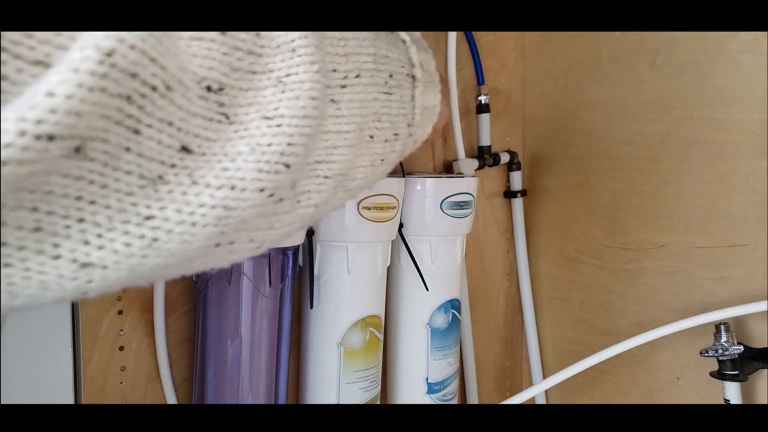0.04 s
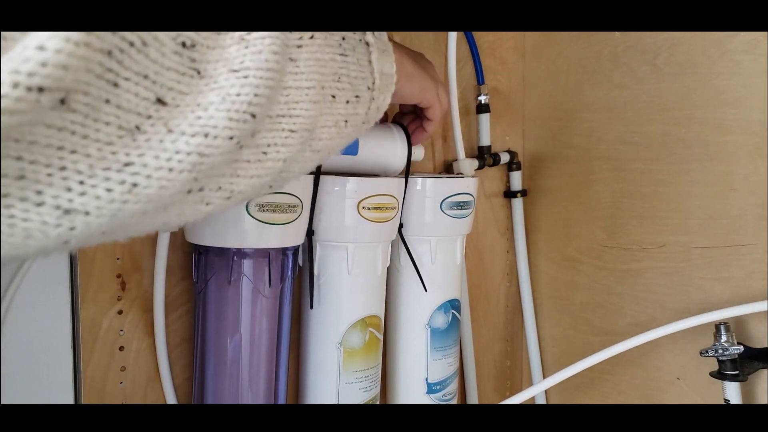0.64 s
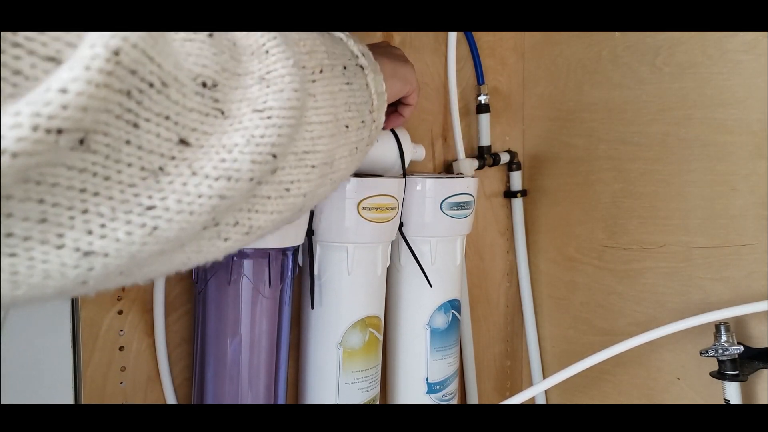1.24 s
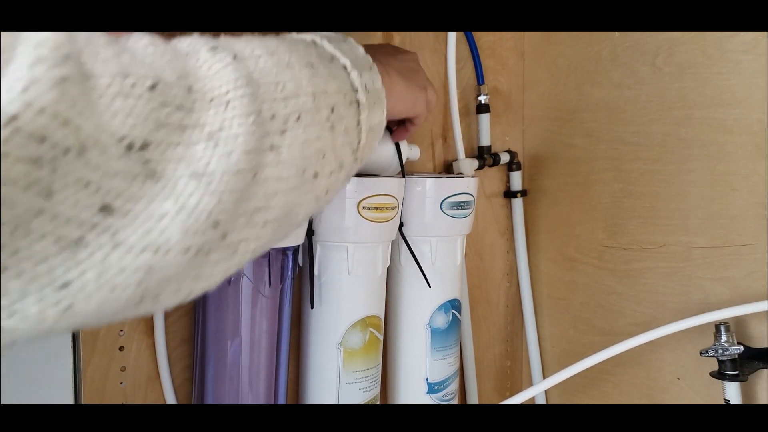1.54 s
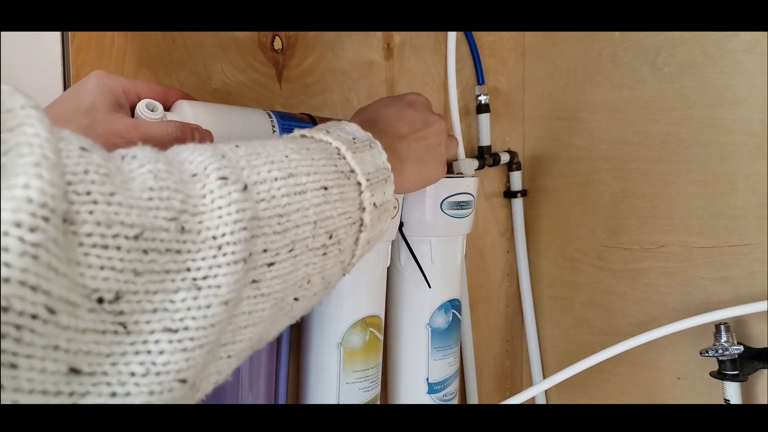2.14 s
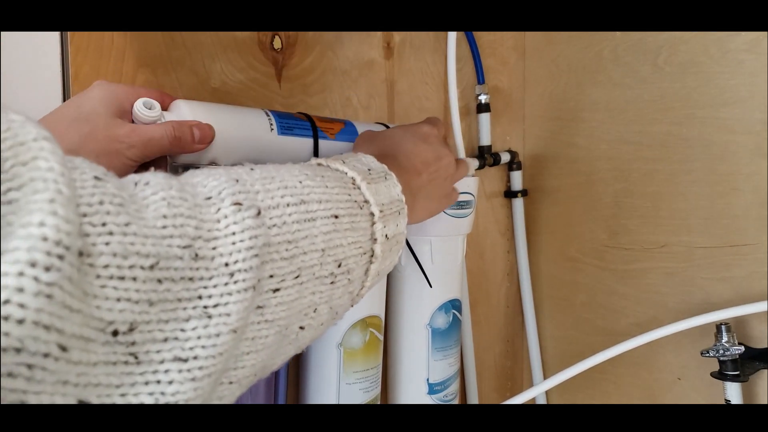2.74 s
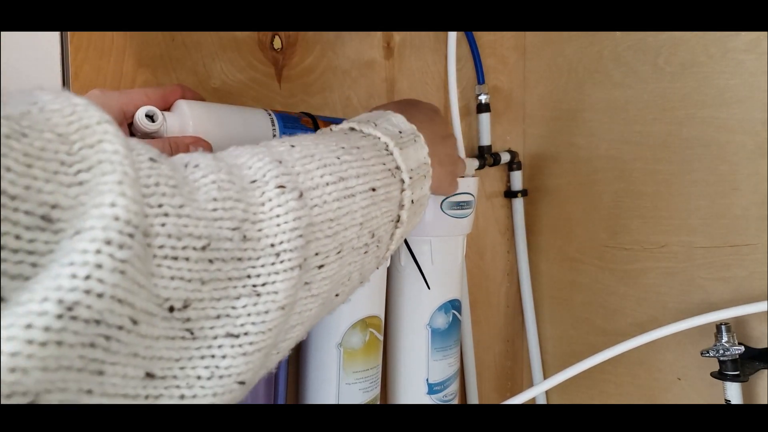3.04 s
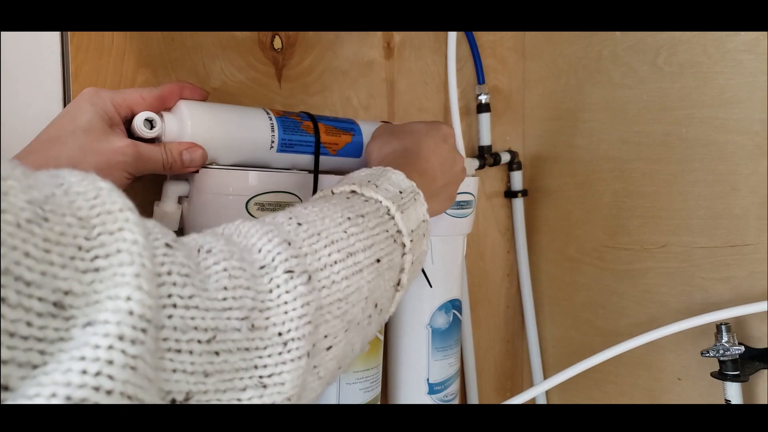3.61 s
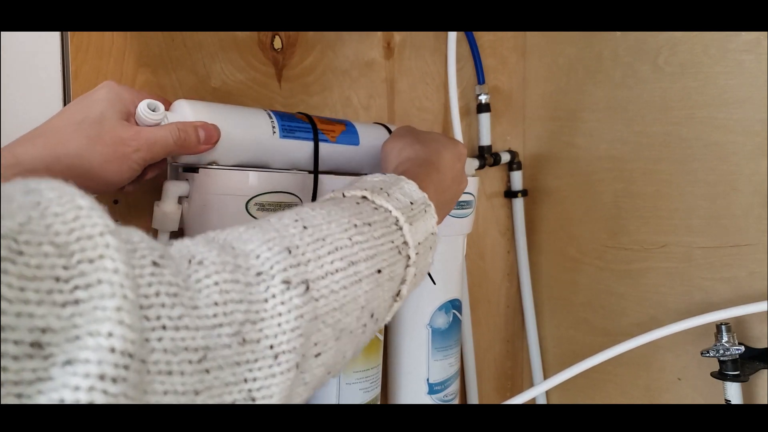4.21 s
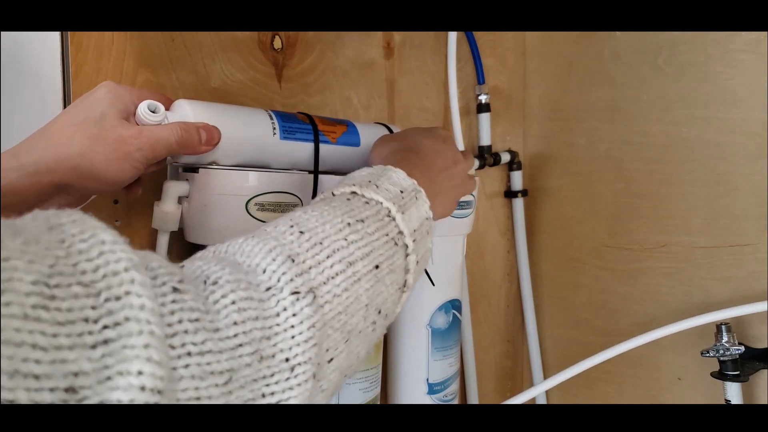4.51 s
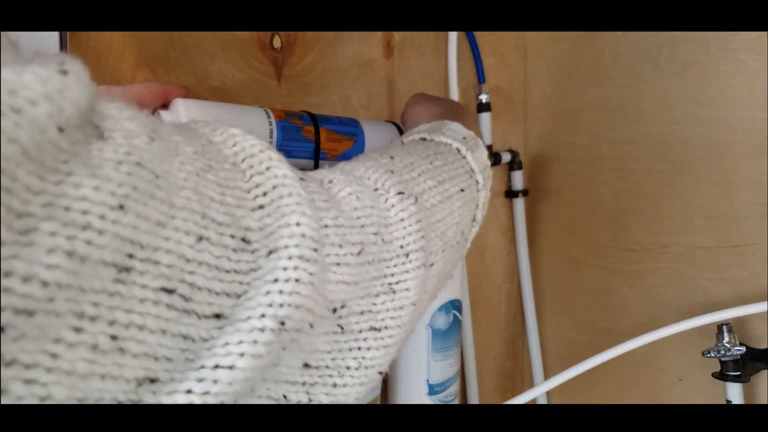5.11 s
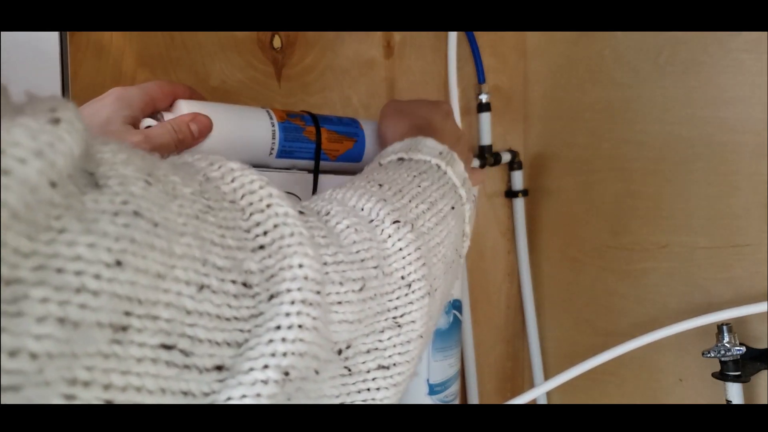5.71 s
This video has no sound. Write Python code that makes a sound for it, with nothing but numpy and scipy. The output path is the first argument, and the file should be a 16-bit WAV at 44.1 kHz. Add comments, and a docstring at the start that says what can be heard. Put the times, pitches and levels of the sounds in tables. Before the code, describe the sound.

A plastic filter cartridge is worked onto plastic housings, with irregular knocks, deep wooden thumps, clicks, scrapes and rubbing over a low indoor rumble.

```python
"""A plastic filter cartridge is worked through a cable tie on a row of housings in a wooden cabinet.
A faint indoor rumble and the rub of hands and a knitted sleeve are there from the start. At once the
first shove bumps the housings and sets the panel behind them booming; the plastic taps, scrapes, clicks
and hoots as it slips. Just after one second the cartridge drops onto a lid with a hollow knock. More
shoves follow, and between about four and five seconds the plastic squeaks under a tight grip."""
import sys
import numpy as np
from scipy import signal
from scipy.fft import rfft, irfft
from scipy.io import wavfile
from scipy.ndimage import map_coordinates

SR = 44100
rng = np.random.default_rng(int(sys.argv[2]) if len(sys.argv) > 2 else 0)


def dump(signal):
    """Clip the signal to [-1, 1] and save it as 16-bit WAV at the path in sys.argv[1]."""
    limited = np.clip(np.atleast_2d(signal).T, -1, 1)
    pcm = np.round(limited * 32767).astype(np.int16)
    wavfile.write(sys.argv[1], SR, pcm)


N = 254016
TIME = np.arange(N) / SR
BLOW = TIME[:SR // 2]   # the time that one blow lasts

# Levels in all tables are relative. A ring_s is the time a tone takes to fade by 60 dB.
# Shoves on the housings: start_s, knock_db, panel_low_tone_db, panel_high_tone_db
SHOVES = [(0.08, -38, -30, -27.5), (0.101, -13, -28, -17.5), (0.127, -14, -16, -26),
          (0.269, -18.5, -19.5, -16.5), (0.573, -13.5, -21.5, -14), (0.67, -46, -38, -28),
          (1.143, -25.5, -24, -15), (1.168, -15.5, -24, -22.5), (1.267, -31, -35, -37),
          (1.403, -35, -32, -46), (1.468, -36, -49, -41), (1.535, -32, -60, -28.5),
          (1.991, -16.5, -19.5, -29), (2.016, -17, -17.5, -17), (2.237, -19.5, -21.5, -27),
          (2.259, -17.5, -20.5, -11.5), (2.578, -18, -28, -9), (2.646, -22, -52, -20),
          (2.723, -29.5, -34.5, -25), (2.976, -15, -20.5, -19.5), (3.007, -25, -27, -18.5),
          (3.064, -18.5, -19.5, -21), (3.155, -13.5, -17, -12), (3.444, -17, -15.5, -31),
          (3.602, -18, -38, -16), (3.667, -22, -44, -19), (3.731, -12, -16, -20.5),
          (3.913, -17, -17, -14.5), (4.022, -10, -14.5, -12.5), (4.093, -33, -18.5, -12),
          (4.275, -38, -26.5, -16), (4.479, -35.5, -30.5, -49), (4.656, -26, -23.5, -24),
          (4.781, -23.5, -27, -10.5), (5.01, -30, -27, -40), (5.063, -10.5, -31, -11.5),
          (5.281, -17, -23, -21.5), (5.426, -26, -19.5, -23), (5.471, -23, -41, -27),
          (5.746, -25, -34, -16.5)]
# Tone colour of the cartridge wall: frequency_hz, level_db
WALL_COLOUR = [(250, 11), (500, 0), (850, 2.5), (1060, 0.5), (1170, 6.5), (1290, 2.5), (1700, 2.5),
               (2250, -4), (2900, -15.5), (6000, -29), (16000, -35.5)]


def from_db(db):
    """Turn decibels into a gain to multiply by."""
    return 10 ** (np.asarray(db) / 20)


def rms_one(x):
    """Scale a signal to an average strength (rms) of 1."""
    return x / np.sqrt(np.mean(x ** 2) + 1e-20)


def unit_energy(x):
    """Scale a response so that noise keeps its level when passed through it."""
    return x / np.sqrt(np.sum(x ** 2) + 1e-20)


def at_hz(points, hz):
    """Read between a table's rows, giving each octave equal room."""
    row_hz, value = np.transpose(points)
    return np.interp(np.log(np.maximum(hz, 1)), np.log(row_hz), value)


def add(out, start_s, sound):
    """Mix a sound in at the given time."""
    start = int(np.clip(round(start_s * SR), 0, N - 1))
    out[start:start + len(sound)] += sound[:N - start]


def through(x, response):
    """Pass a sound through a response: the way a thing answers one tiny tap."""
    return signal.fftconvolve(x, response)[:len(x)]


def colour(spectrum, size=8192):
    """Build a response with the given tone colour."""
    log_gain = np.log(from_db(at_hz(spectrum, np.fft.rfftfreq(size, 1 / SR))))
    cepstrum = irfft(log_gain)
    cepstrum[1:size // 2] *= 2   # folded forward, so nothing sounds before the tap
    cepstrum[size // 2 + 1:] = 0
    return unit_energy(irfft(np.exp(rfft(cepstrum))))


def ring(hz, ring_s):
    """One fading tone of a struck object."""
    return np.sin(2 * np.pi * hz * BLOW) * from_db(-60 * BLOW / ring_s)


def contact(decay_s):
    """A touch chatters for a moment as it settles."""
    return rng.standard_normal(len(BLOW)) * np.exp(-BLOW / decay_s)


def drift(per_s):
    """A random wander, about 1 in size, that turns per_s times a second."""
    points = rng.standard_normal(4096)
    return rms_one(np.interp(TIME * per_s, np.arange(len(points)), points))


def shifting(x, depth_db, width_hz, per_s):
    """As the touching point travels, narrow bands of the sound swell and sink."""
    hz, times, frames = signal.stft(x, SR, nperseg=512)
    points = rng.standard_normal((256, 512))
    grid = np.meshgrid(hz / width_hz, times * per_s, indexing="ij")
    patches = map_coordinates(points, grid, order=1, mode="mirror")
    gain = from_db(depth_db * np.tanh(rms_one(patches)))
    return signal.istft(frames * gain, SR, nperseg=512)[1][:N]


def friction(per_s, spread_db, hiss):
    """Rubbing is many tiny slips on a smooth hiss, always changing colour."""
    sizes = from_db(spread_db * np.minimum(rng.exponential(1, N), 3)) * rng.choice([-1, 1], N)
    slips = rms_one(sizes * (rng.random(N) < per_s / SR))
    noise = slips + hiss * rng.standard_normal(N)
    return rms_one(shifting(noise, depth_db=5.5, width_hz=330, per_s=32))


def room_rumble(level_db):
    """The room hums along as a steady low rumble with a thin hiss on top."""
    # Tone colour of the room's noise: frequency_hz, level_db
    room_colour = [(20, -31), (65, 30), (130, -27), (300, -33), (700, -54), (2000, -13), (7000, -59),
                   (9000, 0.5), (16000, 4.5)]
    return from_db(level_db) * through(rng.standard_normal(N), colour(room_colour))


def fidget(level_db):
    """A gain that follows the small movements of the resting grip."""
    # How restless the hands are: time_s, level_db
    restlessness = [(0, -1), (0.07, -8), (0.2, -6), (0.9, 1), (1.55, -3.5), (1.93, -8.5), (2.1, 9),
                    (2.45, -3.5), (3.1, 7), (3.75, -2), (4.4, -3), (4.7, 1.5), (5.3, 5), (5.76, -1.5)]
    return from_db(level_db + np.interp(TIME, *np.transpose(restlessness)))


def shudder(grip_db, shove_db, decay_s):
    """The mounting trembles under the hands, and harder for a moment after each shove."""
    # Tone colour of the trembling: frequency_hz, level_db
    shudder_colour = [(20, -36), (40, -12), (62, 4), (90, 6.5), (125, -14.5), (175, -5.5), (220, -24.5),
                      (260, -19), (420, -36.5), (800, -55.5), (3000, -88)]
    shaken = np.zeros(N)
    for start_s, _, low_db, high_db in SHOVES:
        panel_swing = np.hypot(from_db(low_db), from_db(high_db))
        add(shaken, start_s, from_db(shove_db) * panel_swing * np.exp(-BLOW / decay_s))
    strength = np.hypot(shaken, fidget(grip_db))
    return through(strength * rng.standard_normal(N), colour(shudder_colour))


def rubbing(wool_db, finger_db, uneven_db, rise_s, fall_s):
    """With each stroke wool swishes and fingers drag on the wall with an uneven grip."""
    # Strokes of sleeve and hand along the cartridge: start_s, length_s, swish_db, drag_db
    strokes = [(0.088, 0.22, -40.5, -38), (0.689, 0.13, -51.5, -42), (0.914, 0.34, -47, -43),
               (1.412, 0.17, -50, -50.5), (1.639, .14, -51, -56), (2, 0.086, -44, -57),
               (2.234, 0.087, -44.5, -43.5), (2.527, 0.15, -42.5, -42), (2.895, 0.15, -42.5, -32.5),
               (3.206, 0.083, -49, -35), (3.279, 0.12, -57, -44), (3.428, 0.036, -44, -43),
               (3.594, .1, -48, -37.5), (3.883, 0.23, -49.5, -40), (4.259, 0.037, -47, -34.5),
               (4.481, .055, -40.5, -41.5), (4.69, 0.17, -40, -40.5), (4.948, 0.06, -34, -37.5),
               (5.188, 0.12, -43.5, -38), (5.426, 0.063, -42.5, -37), (5.57, 0.22, -52, -48.5)]
    # Tone colour of the knitted sleeve: frequency_hz, level_db
    wool_colour = [(500, -20.5), (2000, -2), (3500, -4.5), (5500, -4.5), (7300, -1), (8400, -11),
                   (11000, -6.5), (15500, -6.5)]
    swish, drag = fidget(-56), fidget(-57.5)
    for start_s, length_s, swish_db, drag_db in strokes:
        t = TIME - start_s
        speed = np.clip(t / rise_s, 0, 1) * np.exp(-np.maximum(t - length_s, 0) / fall_s)
        swish = np.maximum(swish, from_db(swish_db) * speed)
        drag = np.maximum(drag, from_db(drag_db) * speed)
    grip_db = uneven_db * drift(per_s=90)
    wool = through(friction(per_s=5600, spread_db=3.5, hiss=1), colour(wool_colour))
    fingers = through(friction(per_s=2400, spread_db=8, hiss=1), colour(WALL_COLOUR))
    return from_db(wool_db + grip_db / 2) * swish * wool + from_db(finger_db + grip_db) * drag * fingers


def panel_booms(low_db, high_db, swell_s):
    """The wooden panel takes a moment to swing up; its two tones throb together as they fade."""
    # The panel's two deep tones: pitch_hz, ring_s
    panel_tones = [(63, 0.39), (91, 0.24)]
    out = np.zeros(N)
    swell = 1 - np.exp(-(BLOW / swell_s) ** 2)
    for start_s, _, shove_low_db, shove_high_db in SHOVES:
        low = from_db(shove_low_db + low_db) * ring(*panel_tones[0])
        high = from_db(shove_high_db + high_db) * ring(*panel_tones[1])
        add(out, start_s, swell * (low - high))
    return out


def housing_knocks(knock_db, clack_db, vary_db, swell_s, clack_s):
    """Each shove rings the housings with a new mix of their tones, and their joints clack."""
    # Tones of the housings on their bracket: pitch_hz, level_db, ring_s
    tones = [(122.3, 1.5, 0.13), (150, 7.5, 0.084), (157, 0.5, 0.14), (183.7, -0.5, 0.16),
             (210, -10.5, 0.33), (259.5, -4.5, 0.24), (289.2, -2.5, 0.09), (308.5, -13.5, 0.26),
             (359.5, -46.5, 0.05)]
    # Tone colour of the joints: frequency_hz, level_db
    clack_colour = [(100, -11), (280, 14.5), (450, -0.5), (650, 6.5), (900, 17.5), (1400, 7.5),
                    (2500, -3.5), (6000, -13.5), (16000, -25.5)]
    knocks, clacks = np.zeros(N), np.zeros(N)
    swell = 1 - np.exp(-BLOW / swell_s)
    for start_s, shove_db, _, _ in SHOVES:
        gains = from_db(vary_db * rng.standard_normal(len(tones))) * rng.choice([-1, 1], len(tones))
        rings = sum(gain * from_db(db) * ring(hz, ring_s) for gain, (hz, db, ring_s) in zip(gains, tones))
        add(knocks, start_s, from_db(shove_db + knock_db) * swell * rings)
        add(clacks, start_s, from_db(shove_db + clack_db) * swell * contact(clack_s))
    return knocks + through(clacks, colour(clack_colour))


def taps(level_db, decay_s):
    """Soft touches on the cartridge wall stir little treble, so they sound dull."""
    # Touches on the wall: start_s, level_db
    touches = [(0.08, -37), (0.105, -22.5), (0.705, -33.5), (0.848, -35), (1.325, -38), (1.466, -30.5),
               (1.487, -32), (1.98, -38.5), (2.585, -25), (2.941, -24.5), (3.159, -31.5), (4.017, -29),
               (4.319, -33.5), (5.065, -29.5), (5.117, -28.5), (5.203, -36.5), (5.411, -30.5)]
    out = np.zeros(N)
    for start_s, db in touches:
        add(out, start_s, from_db(db + level_db) * contact(decay_s))
    return through(out, colour(WALL_COLOUR))


def brighten(x, db, split_hz=6000):
    """A harder contact carries more high treble."""
    top = signal.sosfilt(signal.butter(2, split_hz, "high", fs=SR, output="sos"), x)
    rest = signal.sosfilt(signal.butter(2, split_hz, fs=SR, output="sos"), x)
    return rest - from_db(db) * top


def scrapes(level_db, rise_share, rise_curve):
    """Friction sets in quickly and dies more slowly with each short slide."""
    # Slides of plastic on plastic: peak_s, level_db, length_s, brightness_db
    slides = [(0.093, -34, .026, -2), (0.185, -33, 0.032, -3.5), (0.376, -38.5, 0.032, 1),
              (0.47, -38.5, 0.023, -40), (0.557, -30.5, 0.029, 5.5), (0.634, -38, 0.029, -13),
              (0.767, -40, 0.03, 16.5), (1.006, -21, 0.023, -10.5), (1.078, -39, 0.021, 0),
              (1.166, -24, 0.035, -5.5), (1.992, -37.5, 0.013, -8), (2.097, -38, 0.011, -6),
              (2.211, -30.5, 0.018, -14), (2.579, -19.5, 0.023, -3), (2.67, -43.5, 0.034, 4),
              (2.742, -50, 0.038, 18.5), (2.768, -42, 0.023, 8.5), (2.898, -29.5, 0.026, -15),
              (3.05, -33.5, 0.069, -22), (3.165, -32, 0.032, -43), (3.614, -31, 0.035, -32),
              (3.678, -33.5, .022, 2), (3.741, -34.5, 0.039, -8), (3.94, -37.5, 0.18, 2.5),
              (4.027, -31, 0.013, -1.5), (4.255, -47, .02, 9.5), (4.476, -35.5, 0.031, 4),
              (4.598, -39.5, 0.043, 2.5), (4.664, -31.5, 0.048, -2), (4.742, -24, 0.024, 9),
              (4.789, -25.5, 0.033, -5), (4.932, -39, 0.064, 3.5), (5.065, -36.5, 0.021, 5),
              (5.276, -26.5, 0.032, -24), (5.346, -28.5, .025, 1), (5.417, -32, 0.035, -36)]
    # Tone colour of sliding plastic: frequency_hz, level_db
    slide_colour = [(200, -1), (600, -2), (1500, 1.5), (2600, 4), (3700, 0.5), (5000, -1), (7200, -1.5),
                    (8300, -5), (11000, -3.5), (16000, 1.5)]
    out = np.zeros(N)
    slips = friction(per_s=2500, spread_db=0, hiss=0.93)
    for peak_s, db, length_s, brightness_db in slides:
        near = np.abs(TIME - peak_s) < .2
        progress = (TIME[near] - peak_s) / length_s
        rising = np.abs(progress / rise_share) ** rise_curve
        falling = progress / (1 - rise_share)
        swell = np.exp(-np.where(progress < 0, rising, falling))
        out[near] += from_db(db + level_db) * brighten(slips[near] * swell, brightness_db)
    return through(out, colour(slide_colour))


def shell_ring():
    """The shell rings after one tap, roughened by the hand that grips it."""
    # Tones of the thin plastic shell: pitch_hz, level_db, ring_s
    tones = [(1620, -6, .2), (1666, 0, .25), (1736, -4, .2), (1844, -2, .24), (2407, -2, .18),
             (2587, 2, .2), (2715, -4, .17), (3056, -4, .18), (4275, -1, .19), (4945, 1, .2),
             (5004, -1, .2), (5225, -4, .2), (5784, -4, .18), (6014, -3, .18)]
    out = np.zeros(len(BLOW))
    for k, (hz, db, ring_s) in enumerate(tones):
        grip = 1 + .7 * drift(per_s=150)[:len(BLOW)]
        out += (-1) ** k * from_db(db) * ring(hz, ring_s) * grip
    return unit_energy(out)


def clicks(level_db, rise_s, decay_s, ring_db, echo_db, echo_s):
    """Tie and cartridge edges snap past each other: a crack, near echoes, and the shell ringing on."""
    # Snaps of the tie: start_s, level_db, brightness_db, shell_db
    snaps = [(0.105, -26.5, -17, 2.5), (0.911, -51.5, -3, -35), (0.997, -31, -35, -17),
             (1.167, -26, -8, -23), (1.264, -49.5, 29.5, -13), (2.551, -36.5, 5, -13),
             (2.952, -11, -27.5, -0.5), (3.673, -29, -36, -33), (3.805, -46.5, -20, 13),
             (3.957, -21.5, -15, -1), (4.032, -23.5, -33, -20), (4.265, -43.5, 12.5, -23),
             (4.46, -43, 8, -6), (4.711, -23.5, -9.5, 8), (4.776, -27, -6.5, 1), (5.065, -33.5, -12, -1),
             (5.262, -35, -32, -21), (5.336, -35.5, -5.5, -10)]
    # Tone colour of a crack: frequency_hz, level_db
    crack_colour = [(200, -16.5), (600, -44), (1300, 0), (1680, 8.5), (2100, 3), (2600, 12), (3800, -3),
                    (4300, 5), (5000, 4.5), (6000, -1), (7200, 10), (8300, -1), (10500, 4.5), (16000, 2.5)]
    cracks, blows = np.zeros(N), np.zeros(N)
    swell = 1 - np.exp(-BLOW / rise_s)
    for start_s, db, brightness_db, shell_db in snaps:
        crack = swell * (contact(decay_s) + from_db(echo_db) * contact(echo_s))
        add(cracks, start_s, from_db(db + level_db) * brighten(crack, brightness_db))
        add(blows, start_s, from_db([db + shell_db + ring_db]))
    return through(cracks, colour(crack_colour)) + through(blows, shell_ring())


def slip_tones(slips, level_db, rise_s, fall_s, waver, noise_db):
    """A slip briefly makes the plastic sing: part unsteady tone, part noise near that pitch."""
    out = np.zeros(N)
    wobble = 1 + waver * drift(per_s=800)
    roughness = 1 + from_db(noise_db) * (drift(per_s=260) + 1j * drift(per_s=160))
    for peak_s, db, hz in slips:
        near = np.abs(TIME - peak_s) < .15
        t = TIME[near] - peak_s
        swell = np.exp(-np.maximum(-t / rise_s, t / fall_s))
        tone = np.exp(2j * np.pi * np.cumsum(hz * wobble[near]) / SR)
        out[near] += from_db(db + level_db) * swell * np.real(roughness[near] * tone)
    return out


def hoots(level_db):
    """The hollow cartridge sings as it slips."""
    # Slips of the cartridge: peak_s, level_db, pitch_hz
    slips = [(0.114, -32.5, 1166), (0.58, -54, 1127), (1.005, -44.5, 1118), (1.765, -60, 1110),
             (2.001, -44, 1140), (2.62, -46, 1170), (3.174, -39, 1139), (3.251, -41.5, 1160),
             (3.615, -32, 1150), (3.746, -47, 1167), (3.919, -39.5, 1165), (4.043, -42, 1200),
             (4.184, -50.5, 1186), (4.489, -42.5, 1210), (5.07, -39, 882), (5.208, -36.5, 1178),
             (5.302, -37.5, 1194), (5.38, -45.5, 1203), (5.444, -48, 1190)]
    return slip_tones(slips, level_db, rise_s=0.006, fall_s=0.01, waver=0.022, noise_db=-6)


def lid_knock(level_db):
    """The cartridge drops onto a hollow housing lid, which rings briefly."""
    # Drops onto the lid: start_s, level_db
    drops = [(1.166, -23.5), (1.18, -47)]
    # Tones of the lid: pitch_hz, level_db, ring_s
    tones = [(156, 3, 0.14), (315.3, -5.5, 0.28), (384, -1.5, 0.11), (493, -12, 0.097), (617, 3, 0.054),
             (632, 1.5, 0.029), (687, 5, 0.028), (828, -10.5, 0.105)]
    blows = np.zeros(N)
    for start_s, db in drops:
        add(blows, start_s, from_db([db + level_db]))
    rings = sum((-1) ** k * from_db(db) * ring(hz, ring_s) for k, (hz, db, ring_s) in enumerate(tones))
    return through(blows, rings)


def squeaks(level_db):
    """Plastic squeaks as it slips under a tight grip."""
    # Short, high slips: peak_s, level_db, pitch_hz
    slips = [(3.961, -22, 2558), (4.714, -28, 2628), (4.784, -20, 4700)]
    return slip_tones(slips, level_db, rise_s=0.0017, fall_s=0.0054, waver=0.038, noise_db=-11.5)


def cabinet(x, tail_db):
    """The wooden walls add a short echoing tail that dies faster in the treble."""
    # How long the cabinet rings: frequency_hz, ring_s
    ring_times = [(150, 0.62), (600, 0.51), (1400, 0.29), (3500, 0.12), (9000, 0.2), (16000, 0.27)]
    fade_in = np.clip(BLOW / .004 - 1, 0, 1)   # the first echoes arrive after 4 ms
    edges_hz = np.geomspace(250, 16000, 9)
    tail = np.zeros(len(BLOW))
    for low, high in zip(edges_hz, edges_hz[1:]):
        band_filter = signal.butter(2, [low, high], "band", fs=SR, output="sos")
        band = signal.sosfilt(band_filter, rng.standard_normal(len(BLOW)))
        tail += band * from_db(-60 * BLOW / at_hz(ring_times, np.sqrt(low * high)))
    return x + from_db(tail_db) * through(x, unit_energy(fade_in * tail))


def scene():
    """Mix the plastic noises in the cabinet with the shoves, the hands and the room's rumble."""
    plastic = clicks(level_db=7, rise_s=0.00062, decay_s=0.0084, ring_db=19, echo_db=-6, echo_s=0.0076)
    plastic += scrapes(level_db=-0.5, rise_share=0.45, rise_curve=1.62)
    plastic += taps(level_db=0, decay_s=0.019)
    plastic += hoots(level_db=11.5) + lid_knock(level_db=3) + squeaks(level_db=4.5)
    shoves = panel_booms(low_db=12.5, high_db=9.5, swell_s=0.0076)
    shoves += housing_knocks(knock_db=-6, clack_db=-17, vary_db=3, swell_s=0.0018, clack_s=0.019)
    hands = rubbing(wool_db=-3, finger_db=-4.5, uneven_db=1, rise_s=0.0083, fall_s=0.026)
    hands += shudder(grip_db=-34.5, shove_db=-6.5, decay_s=0.065)
    room = room_rumble(level_db=-65.5)
    return (cabinet(plastic, tail_db=-14) + shoves + hands + room)[None]


def record(dry):
    """The small microphone loses the deepest bass; peaks are rounded and the highest treble is cut."""
    thin = signal.sosfilt(signal.butter(2, 32, "high", fs=SR, output="sos"), dry)
    rounded = 1.2 * np.tanh(thin / 1.2)
    return signal.sosfilt(signal.ellip(10, .1, 90, 15650, fs=SR, output="sos"), rounded)


dry = scene()
out = record(dry)
dump(out)
```